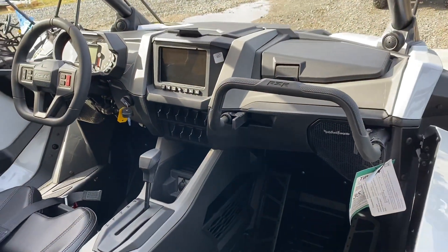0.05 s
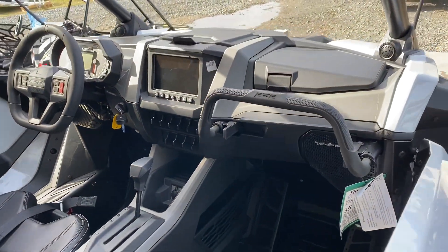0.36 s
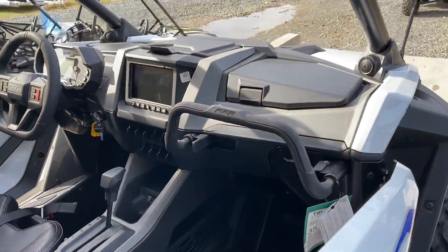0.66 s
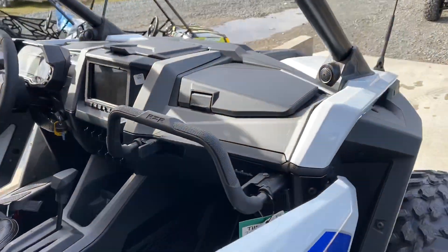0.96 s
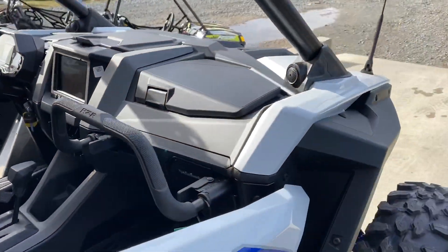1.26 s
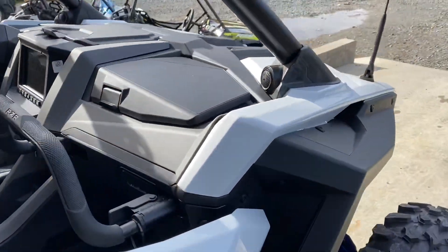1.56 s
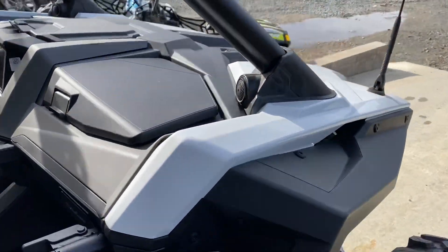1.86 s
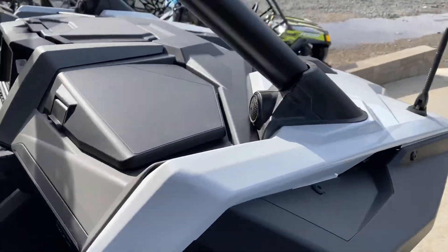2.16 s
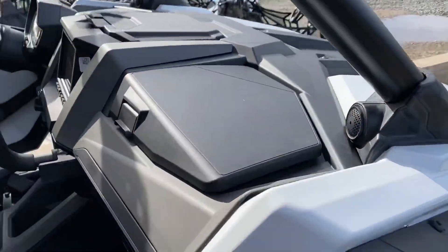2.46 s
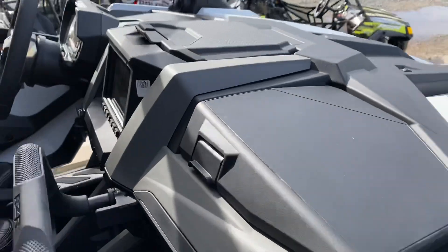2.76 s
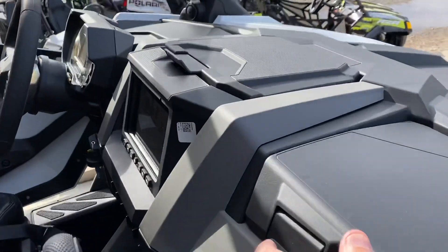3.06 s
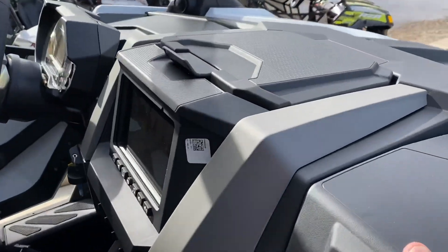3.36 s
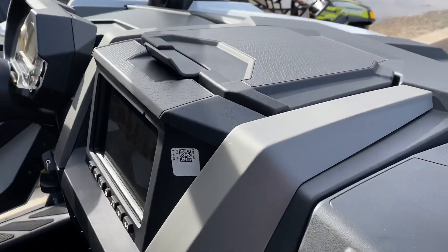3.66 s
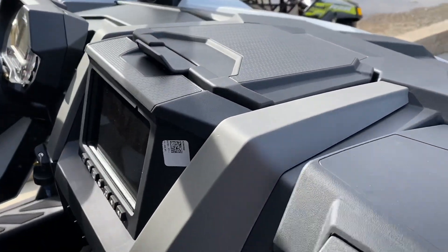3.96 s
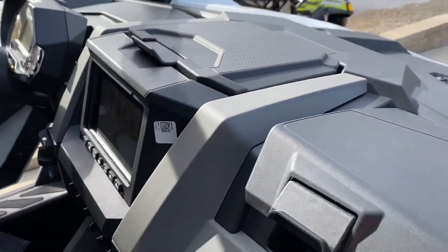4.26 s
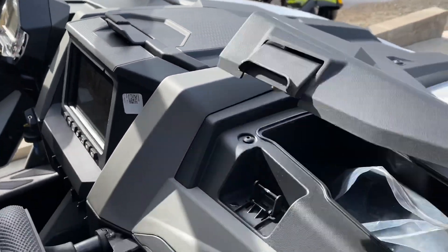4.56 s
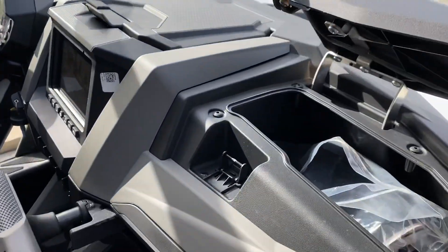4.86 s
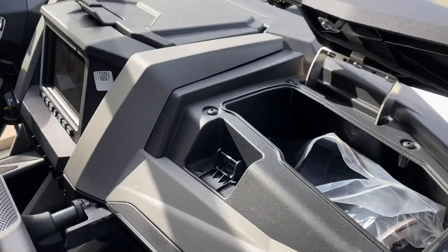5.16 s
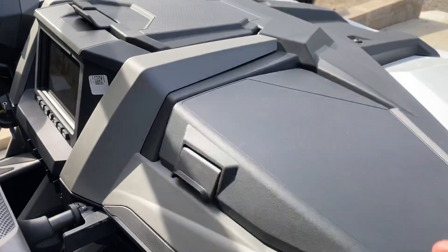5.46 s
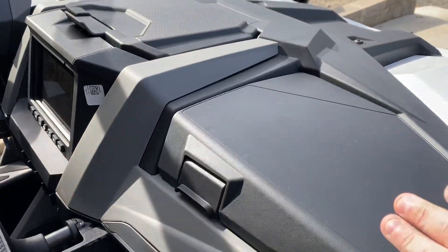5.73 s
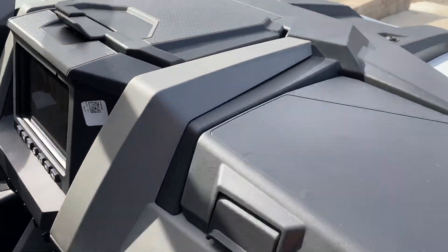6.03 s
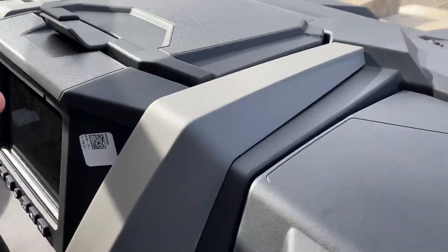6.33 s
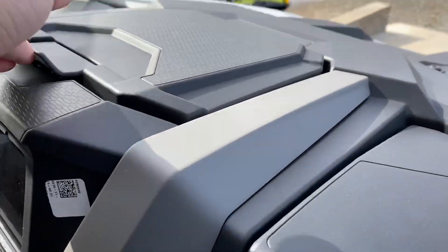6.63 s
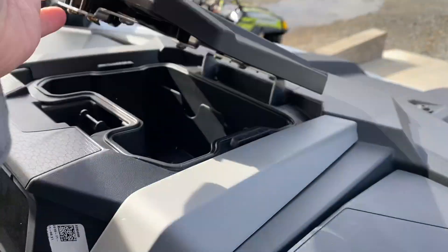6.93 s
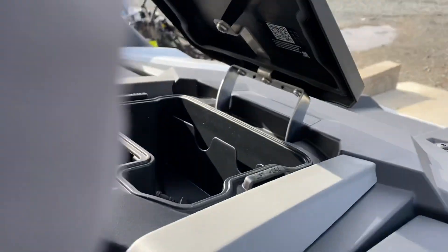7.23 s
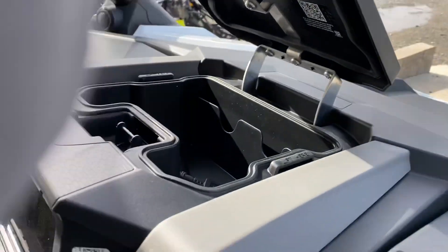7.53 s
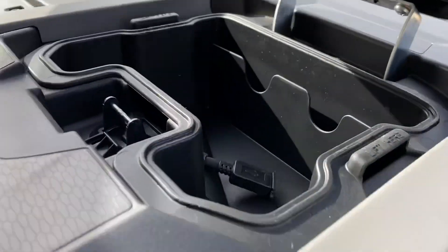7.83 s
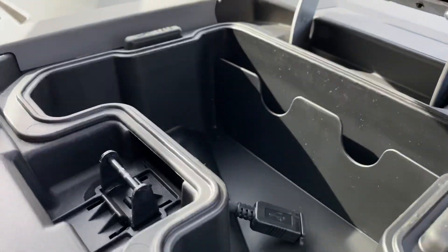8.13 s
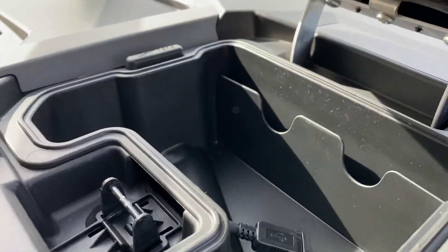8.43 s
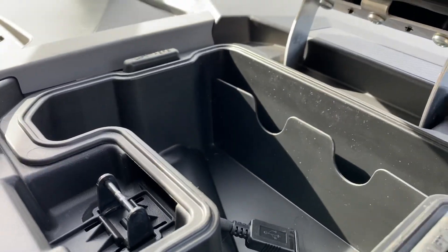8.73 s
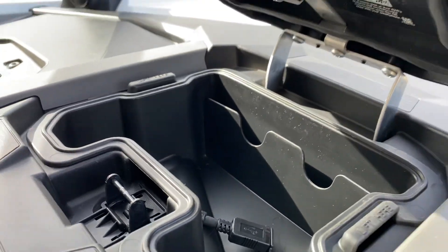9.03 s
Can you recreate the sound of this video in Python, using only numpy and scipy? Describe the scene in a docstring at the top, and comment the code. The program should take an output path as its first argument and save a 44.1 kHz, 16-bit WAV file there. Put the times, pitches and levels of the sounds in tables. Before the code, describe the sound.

Plastic latches click, a lid slams shut and another pops open, over distant traffic rumble and a fading engine drone.

```python
"""Far traffic rumbles outdoors, and the drone of a distant engine sinks slowly in pitch.
Soles scuff and clothing rustles as two plastic storage lids on the dashboard of a parked off-road
vehicle are worked by hand. The first is unlatched, swings up against its hinge stop and is slammed;
the second pops open and a sleeve brushes past. Each blow is a crack plus decaying panel modes;
rubbing is coloured noise with an uneven grain; the engine is two beating tones over exhaust noise."""
import sys
import numpy as np
from scipy import signal
from scipy.fft import rfft, irfft, next_fast_len
from scipy.io import wavfile

SR = 44100
rng = np.random.default_rng(int(sys.argv[2]) if len(sys.argv) > 2 else 0)


def dump_mix(stems):
    """Bounce the given channels to the path in sys.argv[1] as a 16-bit WAV at rate SR."""
    frames = np.atleast_2d(stems).T  # one column per channel
    limited = np.clip(frames, -1, 1)  # hard clip at full scale
    pcm = np.round(limited * 32767).astype(np.int16)
    wavfile.write(sys.argv[1], SR, pcm)


N = 400869
TIME = np.arange(N) / SR


def from_db(db):
    """Decibels to gain."""
    return 10 ** (np.asarray(db) / 20)


def unit_rms(x):
    """Scale to rms 1."""
    return x / np.sqrt(np.mean(x ** 2) + 1e-20)


def at_time(rows, t=TIME):
    """Value columns of a time curve, interpolated at t."""
    times, *columns = np.transpose(rows)
    return [np.interp(t, times, column) for column in columns]


def at_hz(rows, hz):
    """Spectrum value, interpolated over log frequency."""
    freqs, values = np.transpose(rows)
    return np.interp(np.log(hz), np.log(freqs), values)


def pan(left_db):
    """Channel gains for a left-minus-right level."""
    return from_db(np.array([[left_db], [-left_db]]) / 2)


def add(out, start_s, sound):
    """Mix a sound in at start_s."""
    start = int(start_s * SR)
    out[:, start:start + sound.shape[-1]] += sound[..., :N - start]


def drift(per_s):
    """Smooth random curve, rms 1."""
    knots = rng.standard_normal(5000)
    return unit_rms(np.interp(TIME * per_s, np.arange(len(knots)), knots))


def swell(peak_s, sigma_s):
    """Gaussian gain, 1 at its peak."""
    return np.exp(-.5 * ((TIME - peak_s) / sigma_s) ** 2)


def stroke(start_s, hold_s, rise_db_per_s=123, fall_db_per_s=139):
    """Gain of one rub: rise, hold at 1, decay."""
    before_db = np.maximum(start_s - TIME, 0) * rise_db_per_s
    after_db = np.maximum(TIME - start_s - hold_s, 0) * fall_db_per_s
    return from_db(-np.minimum(before_db + after_db, 200))


# Outdoor stereo field: f/Hz, left-right correlation
AIR_CORRELATION = [(40, 1), (120, 0.68), (300, 0.52), (700, 0.071), (2000, 0.17), (6000, 0.11)]


def widen(pair, hz, correlation=AIR_CORRELATION):
    """Two independent signals as mid and side: alike in the bass, apart in the treble."""
    alike = at_hz(correlation, hz)
    mid = np.sqrt((1 + alike) / 2) * pair[0]
    side = np.sqrt((1 - alike) / 2) * pair[1]
    return mid + side * [[1], [-1]]


def noise(spectrum):
    """Coloured stereo noise, rms 1, falling 12 dB/octave beyond the spectrum's ends."""
    size = next_fast_len(N)
    hz = np.maximum(np.arange(size // 2 + 1) * SR / size, 1)
    skirts = np.minimum(hz / spectrum[0][0], 1) ** 2 * np.minimum(spectrum[-1][0] / hz, 1) ** 2
    white = widen(rfft(rng.standard_normal((2, size))), hz)
    return unit_rms(irfft(white * from_db(at_hz(spectrum, hz)) * skirts, size)[:, :N])


def narrowband(hz, wander_per_s):
    """Narrow stereo noise round a centre given per sample."""
    phase = 2 * np.pi * np.cumsum(hz) / SR
    pair = [drift(wander_per_s) * np.sin(phase) + drift(wander_per_s) * np.cos(phase) for _ in range(2)]
    return widen(pair, np.mean(hz))


# Road noise spectra: f/Hz, relative density/dB
RUMBLE_SPECTRUM = [(22, -47), (38, -10.5), (52, 0), (72, 1), (98, -2.5), (135, -10), (165, -17), (220, -29)]
TYRE_SPECTRUM = [(180, -6), (300, -8.5), (450, -11), (750, -10.5), (1000, -13.5), (1600, -20),
                 (2800, -33.5), (4700, -49.5), (8000, -53.5), (14000, -74)]
# Tyre wash: t/s, level/dB
TYRE_LEVEL = [(0.0, -54), (0.68, -51.5), (2.8, -49), (4.03, -46), (6.61, -46.5), (7.21, -45), (8.36, -50.5),
              (9.09, -46)]
# Brief narrow-band swells that colour the road noise: peak t/s, sigma/s, centre f/Hz, level/dB
WASH_SWELLS = [(0.936, 0.11, 795, -55.5), (1.8, 0.16, 852, -55), (2.693, 0.24, 713, -51.5),
               (5.853, 0.47, 1311, -55), (7.394, 0.1, 725, -54), (8.906, 0.32, 858, -53.5)]
# Far whine: peak t/s, sigma/s, level/dB
WHINE_SWELLS = [(3.95, 0.6, -49.5), (6.303, .28, -47.5)]


def traffic(rumble_db=-40.5, whine_hz=262.5, climb_hz_per_s=11):
    """Far road: lumpy rumble, tyre wash of shifting colour and a climbing whine that swells twice."""
    tyre_db, = at_time(TYRE_LEVEL)
    rumble = from_db(rumble_db + drift(19)) * noise(RUMBLE_SPECTRUM)
    tyres = from_db(tyre_db + drift(9)) * noise(TYRE_SPECTRUM)
    colour = sum(from_db(db) * swell(peak_s, sigma_s) * narrowband(np.full(N, hz), wander_per_s=320)
                 for peak_s, sigma_s, hz, db in WASH_SWELLS)
    whine_gain = sum(from_db(db) * swell(peak_s, sigma_s) for peak_s, sigma_s, db in WHINE_SWELLS)
    whine = whine_gain * narrowband(whine_hz + climb_hz_per_s * TIME, wander_per_s=35)
    return rumble * pan(-1.1) + (tyres + colour + whine) * pan(-0.69)


# Distant engine: t/s, firing f/Hz, drone level/dB, exhaust level/dB
ENGINE_RUN = [(0, 137, -53.5, -59.5), (1.0, 130, -42.5, -61.5), (1.5, 126, -37, -43.5),
              (3.0, 119.5, -32, -53.5), (3.7, 118, -40.5, -46.5), (6.3, 111, -44, -48.5),
              (7.0, 100, -49, -45), (7.8, 76, -40, -50), (9.09, 69, -48, -56)]
# Exhaust roar: f/Hz, relative density/dB
EXHAUST_SPECTRUM = [(90, -16), (160, -4), (225, -0.5), (290, -7), (400, -24), (800, -34)]


def engine(waver=0.01195, lower_ratio=.92, lower_db=-2.0, octave_db=-26.0):
    """A wavering firing tone beats with a weaker one just below it, over the exhaust roar."""
    hz, drone_db, exhaust_db = at_time(ENGINE_RUN)
    phase = 2 * np.pi * np.cumsum(hz * (1 + waver * drift(16))) / SR
    lower_phase = 2 * np.pi * np.cumsum(hz * lower_ratio * (1 + waver * drift(21))) / SR
    tones = np.sin(phase) + from_db(octave_db) * np.sin(2 * phase)
    tones += from_db(lower_db) * np.sin(lower_phase)
    drone = from_db(drone_db + 2.0 * drift(16)) * unit_rms(tones)
    exhaust = from_db(exhaust_db) * noise(EXHAUST_SPECTRUM)
    return (drone + exhaust) * pan(-1.2)


# Sole slides: t/s, hold/s, level/dB
SCUFFS = [(0.35, .17, -61), (0.76, 0.45, -59)]
# Grit on concrete: f/Hz, relative density/dB
GRIT_SPECTRUM = [(1400, 6), (1900, -7)]


def scuffs():
    """Grit rolls unevenly under a sliding sole as the listener steps closer."""
    grit_db = 1.2 * drift(14) + 2.5 * drift(200)
    slide = sum(from_db(db) * stroke(start_s, hold_s) for start_s, hold_s, db in SCUFFS)
    return slide * from_db(grit_db) * noise(GRIT_SPECTRUM)


def snags(per_s=14, spread_db=5.5, decay_s=0.0024):
    """Gain spikes of threads that catch and tick."""
    onsets = rng.random(N) < per_s / SR
    ticks = onsets * from_db(spread_db * np.minimum(rng.exponential(1, N), 2))
    return signal.lfilter([1], [1, -np.exp(-1 / (decay_s * SR))], ticks + 1e-18)


# Arm moves: t/s, hold/s, level/dB, treble shelf/dB
ARM_MOVES = [(0.37, 0.22, -68.5, -13), (1.1, 0.7, -70.5, -6), (2.3, 0.48, -72, -11.5),
             (2.92, 0.39, -64.5, 2.5), (3.58, 0.1, -61, 0), (3.94, 0.07, -59, 3), (4.13, .02, -66.5, 3),
             (4.28, 0.44, -63, 6), (5.35, 0.12, -56.5, -1), (5.88, 0.05, -62, 1), (6.2, 0.98, -64.5, -0.5),
             (7.62, 0.27, -67, -3.5), (8.002, 0.15, -75, -8), (8.99, .1, -68.5, -11)]
# Rubbing fabric: f/Hz, relative density/dB
CLOTH_SPECTRUM = [(900, -12.5), (2000, -0.5), (4000, 3), (6000, -1), (8000, 0.5), (11000, -8),
                  (15500, -8.5)]


def rustle(shelf_hz=8000, pressure_db=1.8, snag_db=-3):
    """Clothing rubs under uneven pressure with each arm move."""
    cloth = noise(CLOTH_SPECTRUM) * pan(0.28)
    dull = signal.sosfiltfilt(signal.butter(2, shelf_hz, fs=SR, output="sos"), cloth)
    rubs = sum(from_db(db) * stroke(start_s, hold_s) * (dull + from_db(treble_db) * (cloth - dull))
               for start_s, hold_s, db, treble_db in ARM_MOVES)
    pressure = from_db(pressure_db * drift(16))
    return rubs * (pressure + from_db(snag_db) * snags())


RING_TIME = np.arange(SR // 2) / SR


def ring(modes, scatter_db, spread_rad, t=RING_TIME, rise_s=0.00019):
    """Decaying modes, struck with random strength, reaching the two sides out of phase."""
    out = 0
    for hz, db, t60_s in modes:
        phase = spread_rad * np.sqrt(hz / 1000) * rng.standard_normal((2, 1))
        strength = rng.choice([-1, 1]) * from_db(db + scatter_db * rng.standard_normal())
        out = out + strength * from_db(-60 * t / t60_s) * np.sin(2 * np.pi * hz * t + phase)
    return out * (1 - np.exp(-t / rise_s))


# Clear modes of lid and bin: f/Hz, level/dB, t60/s
LID_MODES = [(194, -22, .17), (277, -18, .14), (327, -22, .1), (386, -21, .09), (514, -23, .14),
             (654, -26, .13), (735, -24, .1), (835, -24, .11), (1020, -14.5, .085), (1156, -16.5, .09),
             (1273, -19, .085), (1546, -20, .07), (1827, -22, .07), (2422, -22, .08), (3280, -25, .06),
             (3347, -18.5, .07), (3404, -25, .06), (4739, -28, .07)]
# Dense ring of moulded plastic: f/Hz, half-octave level/dB, t60/s
PLASTIC_RING = [(135, 8.5, 0.22), (325, 10.5, 0.11), (540, 9, 0.097), (1202, 14, 0.027), (1700, 8.5, 0.061),
                (2700, 4.5, 0.099), (5500, 9, 0.066), (8300, 5, 0.064), (10740, 4.5, 0.068),
                (15000, -4.5, .025)]
# Stereo field of the nearby lids: f/Hz, left-right correlation
LID_CORRELATION = [(150, .9), (1000, 0.37), (6000, 0.32)]
BAND_EDGES_HZ = 22.5 * 2 ** (np.arange(5, 20) / 2)


def blow(db, bass_db, treble_db, part_hz, ring_scale, cab_db,
         crack_db=-3.0, crack_s=0.00085, part_db=5, full_blow_db=-10.0, cab_t60_s=0.305):
    """One plastic blow: clear modes of lid and struck part, a crack, dense panel ring, a cab tail."""
    t = np.arange(int(.3 * SR)) / SR
    # Hard, brief contact feeds the treble; soft, long contact the bass.
    hardness = [(330, bass_db), (800, 0), (2400, 0), (8000, treble_db)]
    lid_db = 1.5 + 0.6 * min(db - full_blow_db, 0)   # only heavy blows ring the whole lid
    part_t60_s = ring_scale * 0.017 * np.sqrt(1000 / part_hz)   # small, high parts die sooner
    modes = [(hz, mode_db + lid_db, t60_s) for hz, mode_db, t60_s in LID_MODES]
    modes.append((part_hz, part_db, part_t60_s))
    modes = [(hz, mode_db + at_hz(hardness, hz), t60_s) for hz, mode_db, t60_s in modes]
    out = ring(modes, scatter_db=2.0, spread_rad=0.4, t=t)
    crack = from_db(crack_db) * np.exp(-t / crack_s)
    plastic = np.array(PLASTIC_RING)
    for low_hz, high_hz in zip(BAND_EDGES_HZ, BAND_EDGES_HZ[1:]):
        hz = np.sqrt(low_hz * high_hz)
        band_db, t60_s = at_hz(plastic[:, [0, 1]], hz), at_hz(plastic[:, [0, 2]], hz)
        panel = from_db(-60 * t / (t60_s * ring_scale))
        tail = from_db(cab_db - 60 * t / cab_t60_s * (1 + (hz / 26870) ** 2))   # highs fade sooner
        band = signal.butter(2, (low_hz, high_hz), "band", fs=SR, output="sos")
        pair = signal.sosfilt(band, rng.standard_normal((2, len(t))) * (crack + panel + tail))
        pair /= np.linalg.norm(pair, axis=1, keepdims=True)
        out += from_db(band_db + at_hz(hardness, hz)) * widen(pair, hz, LID_CORRELATION)
    return from_db(db) * out


# Hard contacts: t/s, level/dB, extra bass/dB, extra treble/dB, struck part f/Hz, ring time factor
CONTACTS = [ (0.432, -44, -4, -28, 1600, .5), (1.106, -54, -8, -0.5, 4530, .6),
            (1.651, -51, -8, -4, 5600, .7), (1.781, -52, -10, -3, 4200, .7),
            (2.031, -37, -28, -1, 1070, 2.2), (2.033, -33.5, -14, 2, 3070, 1.4),
            (2.041, -36.5, -25, -5.5, 6500, 1.2), (2.052, -39.5, -24, -4, 3260, 1),
            (2.2605, -43, 12, -1, 620, .4), (3.3595, -40, -4, 0, 3350, .35),
            (3.365, -37, -5, -13, 1720, .6), (3.5287, -35, -6, -17, 1230, .3),
            (3.588, -37, -13, 2, 1060, 1.2), (3.688, -40.5, 0, -15, 3900, .5),
            (3.7508, -27, -5, -18, 1100, .4), (3.759, -29, 2, -11, 1300, .5),
            (3.767, -23.5, 11.5, -4, 2080, .5), (3.775, -31, 0, -14, 1600, .5),
            (3.787, -32, 2, -17, 1090, .7), (3.793, -29, 12, -11, 4280, .6),
            (3.8211, -25.5, -8, -23, 1900, .45), (4.045, -35, -3, -12, 1350, .6),
            (4.342, -38.5, 9, -7, 4260, .7), (4.384, -40, 18.5, -35, 1240, 1.2),
            (4.7403, -26.5, 0, -7, 1920, .85), (4.746, -39.5, 4, -12, 640, .9),
            (5.384, -21, -2.5, -21, 1920, .4), (5.396, -23, 10.5, -19, 1110, .6),
            (5.422, -28, 4.5, -12, 2000, .5), (5.4391, -6.5, -6.5, 0.5, 5870, .45),
            (5.4407, -13, -1, -6.5, 2250, 1), (5.449, -5.5, -2, -4.5, 1100, .8),
            (5.4526, -12.5, -4.5, 1.5, 3440, .8), (6.536, -38.5, 15, -9.5, 5200, .7),
            (6.638, -40.5, 14, -12, 2270, .6), (6.6645, -35, 16, -9, 3720, .6),
            (6.6768, -36.5, 13.5, 3, 5200, .4), (6.6962, -33.5, 14, 5, 5070, .5),
            (6.700, -30, 8, -21, 1260, 1.1), (6.709, -35.5, 15, -6, 4470, .9)]
# Hand position relative to the listener: t/s, left minus right/dB, extra cab tail/dB
HAND_POSITION = [(2.0, 4, 19), (3.4, -1, -3), (4.4, -6, -1), (4.8, -2, 0), (5.399, -1.5, -3),
                 (6.6, -0.5, -3)]


def contacts(cab_db=-27.0):
    """Latch, lid and dashboard strike each other, drier as the listener steps closer."""
    out = np.zeros((2, N))
    for start_s, db, bass_db, treble_db, part_hz, ring_scale in CONTACTS:
        left_db, far_db = at_time(HAND_POSITION, start_s)
        hit = blow(db, bass_db, treble_db, part_hz, ring_scale, cab_db + far_db)
        add(out, start_s, hit * pan(left_db))
    return out


# Panel thumps: t/s, level/dB, f/Hz, t60/s
THUMPS = [(3.13, -24, 142, 0.17), (3.379, -20.5, 98, 0.082), (3.777, -26, 191, 0.4),
          (4.376, -20, 300, 0.037), (4.394, -23.5, 282, 0.085), (4.45, -29, 325, 0.051),
          (5.441, -14, 383, 0.07), (5.445, -20, 75.6, 0.27), (5.45, -13.5, 272, 0.1),
          (6.697, -15, 369, 0.045), (6.925, -23, 297, 0.079), (7.628, -27, 285, 0.046),
          (7.632, -16, 104, 0.078)]


def thumps(push_s=0.0023, overtone_ratio=1.48, overtone_db=-7.0):
    """Soft knocks flex a whole panel: a low mode and a shorter overtone."""
    out = np.zeros((2, N))
    push = 1 - np.exp(-RING_TIME / push_s)
    for start_s, db, hz, t60_s in THUMPS:
        modes = [(hz, db, t60_s), (hz * overtone_ratio, db + overtone_db, t60_s / 2)]
        add(out, start_s, push * ring(modes, scatter_db=1.0, spread_rad=0.45))
    return out


# Latch drags: t/s, hold/s, scrape level/dB, rasp level/dB
LATCH_DRAGS = [(3.718, 0.02, -46.5, -71), (3.746, 0.048, -36.5, -54), (6.671, 0.039, -46.5, -53)]
# Low scrape and bright rasp: f/Hz, relative density/dB
SCRAPE_SPECTRUM = [(550, -3), (1100, 6.5), (1800, -14), (2400, -4.5), (3100, -29)]
RASP_SPECTRUM = [(2000, -6), (4800, 4), (11000, -5), (15000, -8)]


def latch_drag(slip_db=4.5, slips_per_s=600):
    """The plastic latch tongue sticks and slips on its striker before letting go."""
    scrape = noise(SCRAPE_SPECTRUM) * pan(-2.0)
    rasp = noise(RASP_SPECTRUM)
    out = np.zeros((2, N))
    for start_s, hold_s, scrape_db, rasp_db in LATCH_DRAGS:
        pull = stroke(start_s, hold_s, rise_db_per_s=904, fall_db_per_s=848)
        out += pull * (from_db(scrape_db) * scrape + from_db(rasp_db) * rasp)
    return out * from_db(slip_db * drift(slips_per_s))


# Hinge mode clusters: centre f/Hz, level/dB, t60/s
HINGE_MODES = [(2400, -59, 0.22), (2780, -57, 0.09), (3300, -65, 0.14), (6650, -62, 0.17),
               (6950, -58, 0.06)]
# Modes within a cluster: offset/centre frequency
HINGE_OFFSETS = (-.028, -.009, .006, .024)
# Hits on the stop: t/s, level/dB
HINGE_HITS = [(4.741, 2), (4.754, -3)]


def hinge_stop():
    """The hinge meets its stop, rebounds once and rings faintly in clusters of close modes."""
    out = np.zeros((2, N))
    modes = [(hz * (1 + offset), db, t60_s) for hz, db, t60_s in HINGE_MODES for offset in HINGE_OFFSETS]
    for start_s, db in HINGE_HITS:
        add(out, start_s, from_db(db) * ring(modes, scatter_db=9.0, spread_rad=0.35))
    return out


# Catch modes: f/Hz, level/dB, t60/s
CATCH_MODES = [(4500, -35, 0.012), (5030, -22, 0.01), (9500, -17.5, 0.0077)]


def catch_snap(start_s=6.6955):
    """The second lid's catch snaps free with a short, bright ring."""
    out = np.zeros((2, N))
    add(out, start_s, ring(CATCH_MODES, scatter_db=0.5, spread_rad=0.33))
    return out


# Sleeve brushes: t/s, hold/s, swish level/dB, hiss level/dB
SLEEVE_BRUSHES = [(7.149, 0.05, -51.5, -53.5), (7.224, 0.076, -53.5, -62), (7.399, 0.048, -57, -64),
                  (7.477, 0.044, -47, -53.5), (7.553, 0.06, -60.5, -52.5)]
# Swish and fine hiss: f/Hz, relative density/dB
SWISH_SPECTRUM = [(700, 11), (1500, -0.5), (3000, -2.5), (5800, -0.5), (7500, -11.5), (12000, -32)]
HISS_SPECTRUM = [(4000, -54), (7000, -7), (10500, -8), (15500, -11.5)]


def sleeve():
    """A sleeve slides close by, swishing mostly on the left."""
    swish = noise(SWISH_SPECTRUM) * pan(14.5)
    hiss = noise(HISS_SPECTRUM)
    out = np.zeros((2, N))
    for start_s, hold_s, swish_db, hiss_db in SLEEVE_BRUSHES:
        slide = stroke(start_s, hold_s, rise_db_per_s=600, fall_db_per_s=398)
        out += slide * (from_db(swish_db) * swish + from_db(hiss_db) * hiss)
    return out


def radiate(knocks, split_hz=1800):
    """The panels radiate their lows from the right; their brighter edge faces left."""
    lows = signal.sosfilt(signal.butter(1, split_hz, fs=SR, output="sos"), knocks)
    return lows * pan(-0.71) + (knocks - lows) * pan(3.0)


def scene(weave_db=1.2, grains_per_s=150):
    """Lids, clothing and shoes close by; traffic and engine far off."""
    lids = radiate(contacts() + thumps() + hinge_stop() + catch_snap()) + latch_drag()
    clothing = (rustle() + sleeve()) * from_db(weave_db * drift(grains_per_s))
    return lids + clothing + scuffs() + traffic() + engine()


def record(dry, shared_above_hz=7400, lag_s=.000185, ceiling=.9, cutoff_hz=16000):
    """Both channels share one high treble, later on the right; peaks are rounded, the top is cut."""
    size = next_fast_len(N + SR // 10)
    hz = np.arange(size // 2 + 1) * SR / size
    left, right = rfft(dry, size)
    shared = 1 / (1 + (shared_above_hz / (hz + 1)) ** 20)
    late_left = left * np.exp(-2j * np.pi * hz * lag_s)
    right = np.sqrt(1 - shared) * right + np.sqrt(shared) * late_left
    stereo = irfft(np.array([left, right]), size)[:, :N]
    rounded = ceiling * np.tanh(stereo / ceiling)
    return signal.sosfilt(signal.ellip(10, .2, 80, cutoff_hz, fs=SR, output="sos"), rounded, axis=1)


dry = scene()
out = record(dry)
dump_mix(out)
```